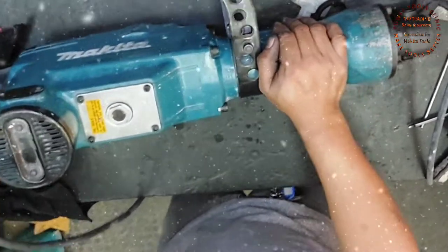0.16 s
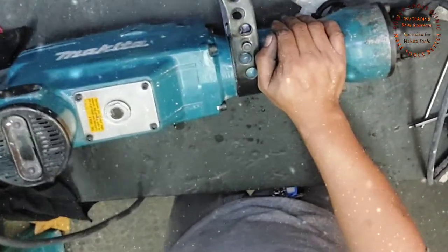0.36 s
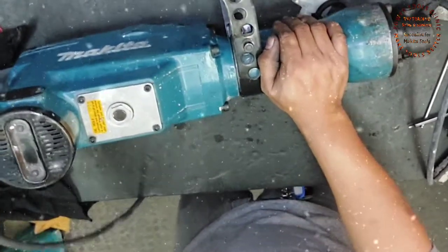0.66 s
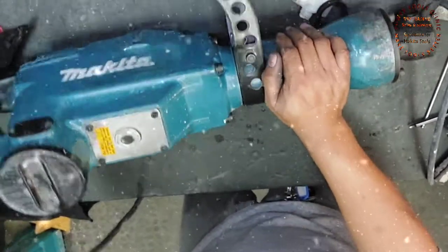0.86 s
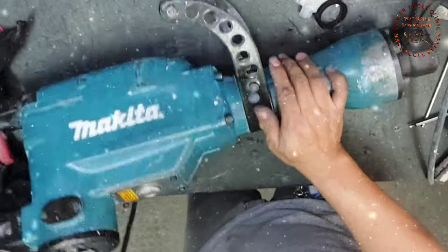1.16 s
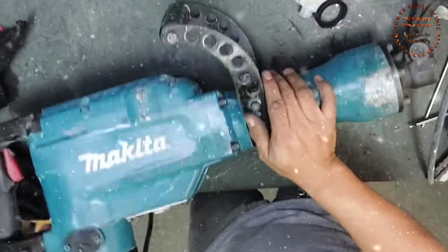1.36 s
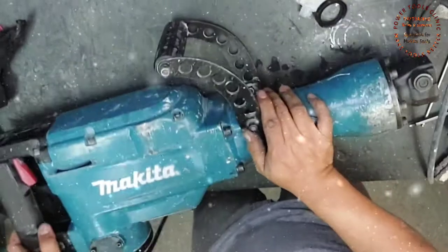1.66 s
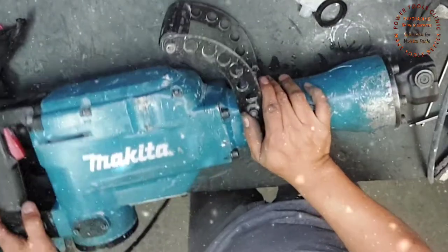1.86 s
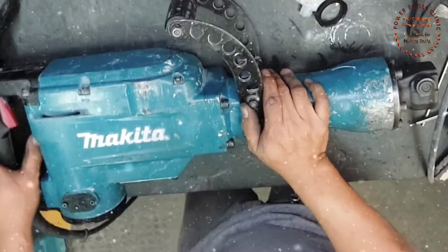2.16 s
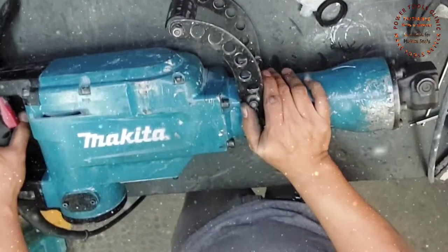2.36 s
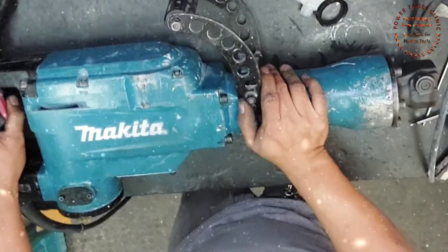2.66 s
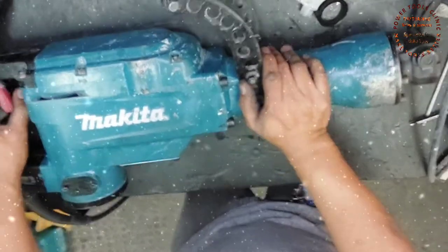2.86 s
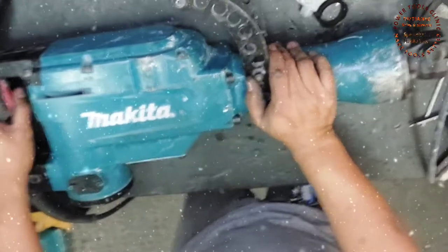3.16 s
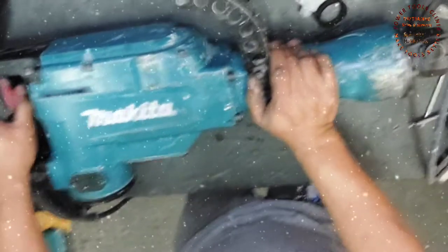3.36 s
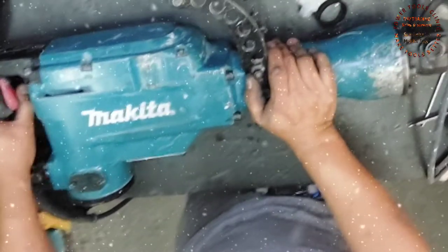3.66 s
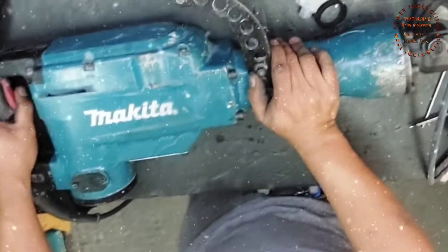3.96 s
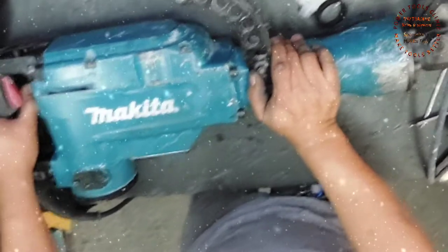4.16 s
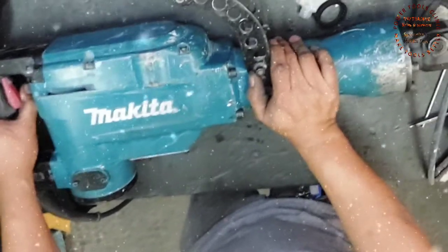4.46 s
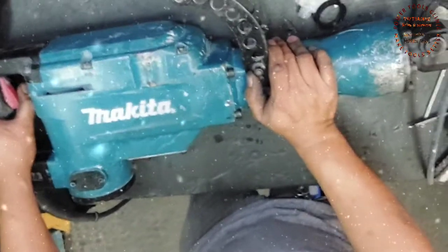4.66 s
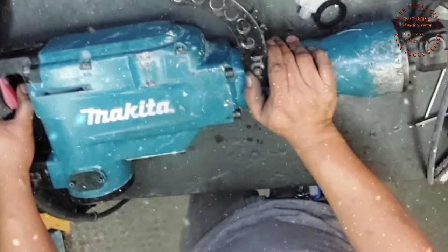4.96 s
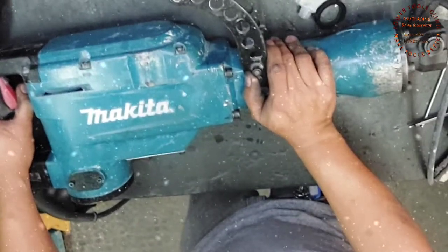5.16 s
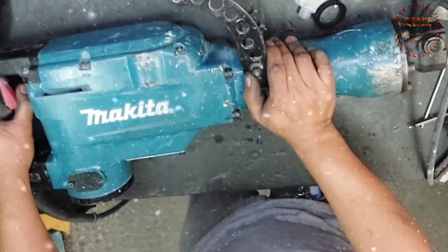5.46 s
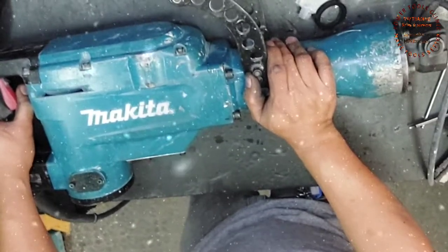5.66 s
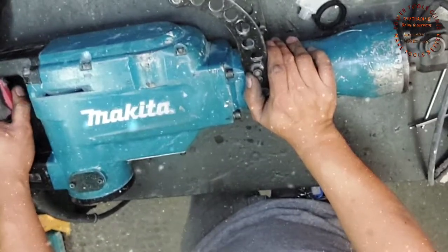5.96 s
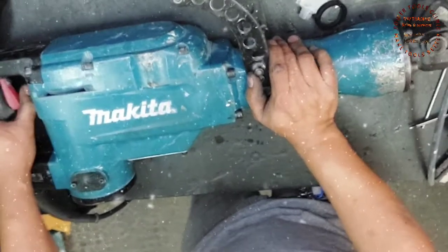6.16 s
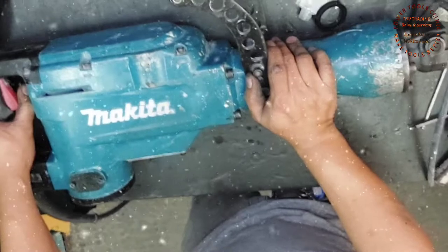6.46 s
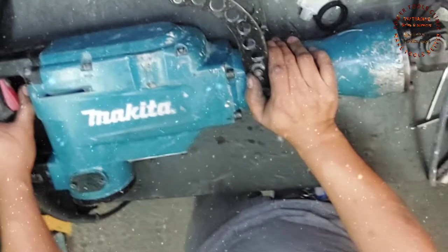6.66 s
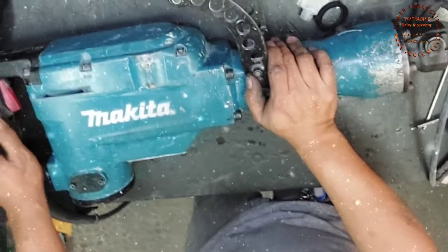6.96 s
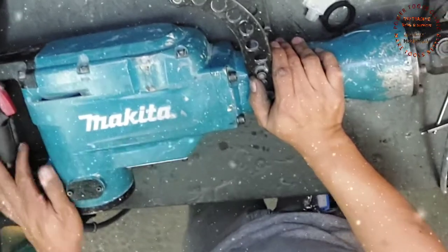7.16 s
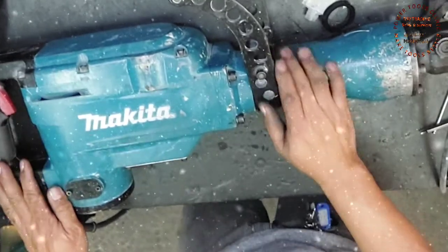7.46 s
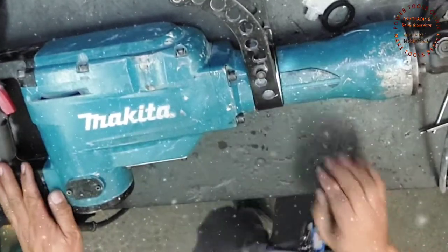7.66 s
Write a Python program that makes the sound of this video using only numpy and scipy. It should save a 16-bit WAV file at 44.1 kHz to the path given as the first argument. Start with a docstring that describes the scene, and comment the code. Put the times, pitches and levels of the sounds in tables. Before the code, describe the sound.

An electric demolition hammer runs unloaded on a steel bench, heard close in a small workshop with a faint low rumble. At the start it is already coasting down, its gears clattering in pulses that slow to a growl and stop by about 1.7 seconds; a faint, thin whistle falls around 0.7. Small bumps and rubbing surround a heavy thud at 2 seconds as the tool is rolled over. At 2.6 it starts with a click and fires three bursts: briefly, then from 3 to 3.5, then from 3.8 to 4.1. The gears rattle fast, the fan hisses and the body drums on the bench. It then winds down, nearly stopping, until a final short burst at 5.8 seconds. The clatter slows again, with two sharp clicks around 6.6 and 6.8, groaning to rest near 7.6 before a light bump.

```python
"""Demolition hammer on a steel bench

An electric hammer runs unloaded: it coasts to rest, is rolled over with a thud, then fires in bursts.
Its gears clatter in one swell per piston stroke and growl as they slow; the fan hisses, and at top
speed the body drums on the bench. A small workshop answers around a close microphone."""
import sys
import numpy as np
from scipy import signal
from scipy.fft import rfft, irfft, next_fast_len
from scipy.io import wavfile
from scipy.ndimage import uniform_filter1d, map_coordinates

SR = 44100
rng = np.random.default_rng(int(sys.argv[2]) if len(sys.argv) > 2 else 0)


def persist_wave(psi):
    """Save psi, clipped to +-1, as 16-bit WAV."""
    counts = np.round(np.clip(psi, -1, 1) * 32767).astype(np.int16)
    wavfile.write(sys.argv[1], SR, np.atleast_2d(counts).T)


N = 344411
TIME = np.arange(N) / SR
TEETH = 65.5  # tooth contacts per stroke; one stroke is one turn of the crank
WORKING_SPEED, GEAR_STALL = 20, 2.67  # strokes/s

# housing resonances: f/Hz, width/Hz, level/dB
HOUSING_MODES = [(601.4, 10.5, 3), (863, 57, -0.5), (1072, 42, -1.5), (1125, 18, -8), (1277, 91, -2),
                 (1388, 95, -2), (1570, 270, -0.5), (1798, 58, -2.5), (1908, 40, 4), (2037, 125, -2),
                 (2160, 73, 0.5), (2382, 43, 2.5), (2621, 17, 7.5), (2693, 89, 1), (3510, 21, -23),
                 (4060, 70, -39), (4585, 36, -32), (4200, 15, -23), (4680, 130, -19), (5416, 82, -0.5),
                 (5417, 73, 4), (5600, 24, -38), (7830, 140, -17.5), (11720, 170, -18.5), (13200, 70, -23)]
# colour of clattering steel: f/Hz, level/dB
CLATTER_SPECTRUM = [(30, -19), (120, -15.5), (300, -9), (700, -2.5), (1100, -7.5), (1600, -3.5),
                    (2600, 1.5), (3200, 2), (4600, -0.5), (5600, -3), (6100, -13), (8200, -13),
                    (10000, -29.5), (16000, -23)]
# colour of the hiss, also the bright edge of clicks and clacks: f/Hz, level/dB
HISS_SPECTRUM = [(100, -18.5), (1000, 1.5), (5000, -0.5), (6300, -3.5), (8000, -1.5), (9200, -7.5),
                 (10600, -6.5), (12200, -4.5), (14000, -11), (16000, -14)]


def amp(db):
    """Decibels to gain."""
    return 10 ** (np.asarray(db) / 20)


def unit(x):
    """Scale to rms 1."""
    return x / np.sqrt(np.mean(x ** 2) + 1e-20)


def along(points, hz):
    """Read (frequency, value) points on a log axis."""
    f, v = np.transpose(points)
    return np.interp(np.log(hz + 1), np.log(f), v)


def curves(rows):
    """One automation curve for each column after the time."""
    times, *columns = np.transpose(rows)
    return [np.interp(TIME, times, column) for column in columns]


def wobble(rate):
    """A smooth random curve, rate knots a second."""
    knots = rng.standard_normal(int(N * rate / SR) + 4)
    return map_coordinates(knots, [TIME * rate])


def noise():
    """Two unrelated white noises."""
    return rng.standard_normal((2, N))


def patchy(depth_db, size=512):
    """Two noises whose colour shifts from moment to moment."""
    spectra = signal.stft(noise(), nperseg=size)[2]
    patches = uniform_filter1d(rng.standard_normal(spectra.shape[1:]), size=2, axis=0)
    patches = unit(uniform_filter1d(patches, size=7, axis=1))
    return unit(signal.istft(spectra * amp(depth_db * patches), nperseg=size)[1][:, :N])


def pulses(cycles, scatter_db):
    """A pulse wherever cycles passes a whole number, up to scatter_db louder or softer."""
    passed = np.floor(np.maximum.accumulate(cycles))
    return np.diff(passed, prepend=passed[0]) * amp(scatter_db * rng.uniform(-1, 1, N))


def filtered(x, response):
    """Filter x by a complex function of frequency."""
    size = next_fast_len(N + SR // 2, True)
    return irfft(rfft(x, size) * response(np.fft.rfftfreq(size, 1 / SR)), size)[..., :N]


def coloured(x, spectrum, size=4096):
    """Minimum-phase EQ with the given spectrum; white noise keeps its level."""
    gain = amp(along(spectrum, np.fft.rfftfreq(size, 1 / SR)))
    cepstrum = irfft(np.log(gain))
    cepstrum[1:size // 2] *= 2
    cepstrum[size // 2 + 1:] = 0
    kernel = irfft(np.exp(rfft(cepstrum)))
    return signal.oaconvolve(x, kernel[None] / np.linalg.norm(kernel), axes=1)[:, :N]


def ringing(x, modes):
    """x rings a set of modes; white noise keeps its level."""
    t = np.arange(SR // 6) / SR
    kernel = sum((-1) ** k * amp(db) * width * np.exp(-np.pi * width * t) * np.cos(2 * np.pi * hz * t)
                 for k, (hz, width, db) in enumerate(modes))
    return signal.oaconvolve(x, kernel[None] / np.linalg.norm(kernel), axes=1)[:, :N]


def spread(pair):
    """Two unrelated signals become left and right, centred in the low mids and wide in the treble."""
    # left-right likeness: f/Hz, correlation/0-1
    likeness = [(30, 0.5), (100, 0.4), (280, 0.98), (600, 1), (1500, 0.17), (4000, 0.39), (9000, 0),
                (15000, 0)]
    angle = lambda hz: np.arccos(np.clip(along(likeness, hz), 0, 1)) / 2
    mid, side = filtered(pair, lambda hz: np.array([np.cos(angle(hz)), np.sin(angle(hz))]))
    return np.array([mid + side, mid - side])


def add(track, start_s, sound):
    """Mix a sound into a track."""
    part = track[..., round(start_s * SR):][..., :sound.shape[-1]]
    part += sound[..., :part.shape[-1]]


def swell(centre_s, width_s):
    """A bell-shaped envelope."""
    return np.exp(-.5 * ((TIME - centre_s) / width_s) ** 2)


def driven_db(effort, growth_db, stall=GEAR_STALL):
    """Level against working speed: up growth_db per doubling of effort, collapsing below the stall."""
    effort = np.maximum(effort, .05)
    return growth_db * np.log2(effort / WORKING_SPEED) - 20 * np.log10(1 + (stall / effort) ** 4)


def crank(start_speed=12.79, free_speed=32.3566, switch_s=.005, step_s=.001):
    """The triggered motor pulls the crank against drag and dry friction; speeds are in strokes/s."""
    # trigger pulls: press/s, release/s, time to take up the slack in the gears/s
    trigger = [(-.1, .0713, 0), (2.6317, 2.8029, 0), (2.9942, 3.4614, 0), (3.8343, 4.0804, 0),
               (5.8263, 6.0219, .011)]
    # the dying crank rocks on the piston's air cushion: t/s, added effort/(strokes/s)
    rocks = [(1.56, 1.02), (1.657, 2.58), (5.715, 0.9), (7.44, 0.2)]
    # the teeth close abruptly and ease off slowly: position/turns, relative load
    load_cycle = [(0, -1.7), (0.033, 0.22), (.22, 0.97), (.42, 0.31), (.57, -0.46), (.85, -0.35), (1, -1.4)]
    pull, friction, drag = 413.68, 7.004, .5471  # strokes/s^2, strokes/s^2, 1/s

    def switched(t, press, release):
        return np.interp(t, [press, press + switch_s, release, release + switch_s], [0, 1, 1, 0])

    moments, speeds = np.arange(0, N / SR, step_s), [start_speed]
    for on in sum(switched(moments, press, release) for press, release, _ in trigger):
        now = speeds[-1]
        acceleration = on * pull * (1 - now / free_speed) ** 2 - drag * now - friction
        speeds.append(max(0, now + step_s * acceleration))
    speed = np.interp(TIME, moments, speeds[1:])
    turns = .0422 + np.interp(TIME, moments, np.cumsum(speeds[1:]) * step_s)
    current = sum(switched(TIME, press + slack_s, release) for press, release, slack_s in trigger)
    torque = current * (1 - speed / free_speed) ** 2
    rocking = np.array([swell(s, width_s=.038) for s, _ in rocks])
    # effort drives loudness: full torque counts as 17 strokes/s more
    effort = speed + 17 * torque ** 1.48 + np.array(rocks)[:, 1] @ rocking
    # strong torque, or the crank rocking back, keeps the teeth closed
    closed = np.clip(.79 * np.tanh((torque / .35) ** 2) + .56 * rocking.sum(axis=0), 0, 1)
    load = np.interp((turns - .831) % 1, *np.transpose(load_cycle))
    load += closed * (1 - load)
    return speed, turns, load, effort, torque, current


def gear_clatter(speed, mesh, load, effort, contact_s=.00051, pinion_teeth=7):
    """Teeth strike and scrape under load, ringing the housing, cover plate, beater case and striker."""
    # cover plate resonances: f/Hz, width/Hz, level/dB
    plate_modes = [(235.3, 14.5, -9.5), (1787, 98, -12), (2635, 102, -1), (2656, 54, 4.5), (5460, 43, -9)]
    # the plate faces up until the body is rolled over: t/s, relative level/dB
    plate_facing = [(0, -4), (.95, -9.5), (1.09, 5), (1.4, -28), (2.7, -10), (7.5, -38)]
    # the beater case rings at speed: f/Hz, width/Hz, level/dB
    beater_modes = [(1375, 86, -5.5), (1620, 110, -17), (3947, 50, 6), (4250, 43, -20), (4337, 88, 6),
                    (4540, 120, -0.5), (4590, 29, 3), (4886, 176, 7), (4970, 32, -1), (5070, 120, -22),
                    (5424, 78, 7.5)]
    # the loose steel striker zings whichever way the body lies: f/Hz, width/Hz, level/dB
    striker_modes = [(5470, 170, 0), (5620, 140, -3)]
    # each contact is a brief scrape; at speed they run together
    touches = pulses(mesh + .12 * wobble(500), scatter_db=12) ** 2
    contact = signal.lfilter([1], [1, -np.exp(-1 / (contact_s * SR))], touches)
    contact /= np.abs(uniform_filter1d(contact, size=4000)) + 1e-3
    scrape = np.sqrt(.5 + .5 * contact) * patchy(depth_db=3)
    # each pinion tooth has its own strength; randomly sized strikes widen the clatter in stereo
    wear = unit(rng.standard_normal(pinion_teeth))[np.floor(mesh).astype(int) % pinion_teeth]
    side_strikes = rng.standard_normal(N)
    teeth = pulses(mesh, scatter_db=2) * np.sqrt(SR / (TEETH * speed + 300))
    strikes = np.array([wear, side_strikes]) * teeth
    stroke_db = (7.5 - .11 * speed) * load
    level_db = -18.5 + driven_db(effort, growth_db=7.5) + stroke_db + .95 * wobble(130)
    force = amp(level_db) * (.39 * strikes + .8 * scrape)
    pace = speed / (speed + 12)
    rattle = amp(-5.5 + 1.77 * pace) * coloured(force, CLATTER_SPECTRUM)
    # the blows reach the other parts a little later, through the metal
    later = lambda ms: np.roll(force, round(ms * SR / 1000), axis=1)
    facing_db, = curves(plate_facing)
    housing = amp(2 - 15.36 * pace) * ringing(later(4.3), HOUSING_MODES)
    plate = ringing(amp(facing_db - .5) * later(1.24), plate_modes)
    beater = amp(-26.5 + 30.4 * pace) * ringing(later(2.9), beater_modes)
    striker = amp(-4 - 23.5 * pace) * ringing(later(.6), striker_modes)
    return spread(rattle + housing + plate + beater + striker)


def gear_growl(speed, mesh, load, effort, torque, knock_speed=5.1, jolt_db=19):
    """Loose teeth knock in the crankcase, most when slow or jolted; a rough whine rides each stroke."""
    # colour of the knocks: f/Hz, level/dB
    growl_spectrum = [(40, -35), (170, -14), (250, -7.5), (330, 7), (440, -1.5), (600, 7), (800, 0.5),
                      (1100, -13), (2000, -1.5), (6000, -62)]
    # crankcase resonances: f/Hz, width/Hz, level/dB
    crankcase_modes = [(270.4, 33, -1.5), (407.6, 30, 0.5), (460, 16.5, -2), (607.6, 30, 1.5),
                       (731, 56, -4), (884, 24, -10.5)]
    # some of the last strokes groan in the crankcase: t/s, boost/dB
    groans = [(1.085, 5), (1.285, 5.5), (5.47, 3), (5.73, 1.5), (7.21, 4), (7.45, 5.5)]
    groan_db = sum(db * swell(s, width_s=.026) for s, db in groans)
    # near knock_speed single teeth are slow enough to ring the case
    slow_db = 5 * np.exp(-2 * np.log(np.maximum(effort, .05) / knock_speed) ** 2)
    knock_db = -45 + driven_db(effort, growth_db=0) + groan_db + slow_db + jolt_db * torque + 5 * load
    teeth = pulses(mesh + .13 * wobble(200), scatter_db=12) * np.sqrt(SR / (TEETH * speed + 20))
    knocks = amp(knock_db) * (teeth + .6 * noise())
    mesh_tone = np.sin(2 * np.pi * (mesh + .097 * wobble(120)))
    whine_db = -37 + driven_db(speed, growth_db=5) + 13.5 * load + 3.7 * wobble(45)
    whine = np.tanh(speed / 4) ** 4 * amp(whine_db) * mesh_tone
    crankcase = amp(-.5) * ringing(knocks, crankcase_modes)
    return amp(-5.5) * coloured(knocks, growl_spectrum) + crankcase + whine


def fan(load, effort, current, brush_db=1.5):
    """Cooling air hisses with each stroke; the brushes add to it while current flows."""
    level_db = -29 + driven_db(effort, growth_db=8, stall=.75) + brush_db * current
    flutter_db = 2 * load + .88 * wobble(90)
    return spread(coloured(amp(level_db + flutter_db) * patchy(depth_db=4), HISS_SPECTRUM))


def clicks(t60_s=.02):
    """Short bright cracks ring the housing; faint even ticks follow while the tool rests."""
    # sharp clicks of the tool: t/s, relative level/dB
    sharp_clicks = [(.578, -21), (1.034, -25), (2.037, -18), (2.63, -9), (5.235, -23), (5.828, -31),
                    (5.839, -18), (6.594, -16), (6.766, -17.5), (7.38, -31), (7.467, -31), (7.602, -43)]
    ticks = [(2.132 + k * .055, -46) for k in range(9)]
    cracks, t = np.zeros((2, N)), np.arange(SR // 10) / SR
    for s, db in list(sharp_clicks) + ticks:
        add(cracks, s, amp(db - 60 * t / t60_s) * rng.standard_normal((2, len(t))))
    snap = amp(-7) * coloured(cracks, HISS_SPECTRUM) + amp(-8.5) * coloured(cracks, CLATTER_SPECTRUM)
    return spread(snap + amp(-.5) * ringing(cracks, HOUSING_MODES))


def bearing_whistle():
    """A bearing sings once, a thin wavering tone that falls."""
    # the whistle's glide: t/s, f/Hz, relative level/dB
    glide = [(.6, 8500, -65), (.66, 7950, -49), (.7, 7520, -48), (.72, 7420, -37), (.75, 7330, -35),
             (.79, 7250, -45), (.83, 7100, -75)]
    hz, level_db = curves(glide)
    envelope = amp(level_db - 4 + 2 * wobble(60.9))
    return envelope * np.sin(2 * np.pi * np.cumsum(hz + 20 * wobble(140)) / SR)


def bumps(reach_octaves=.77, attack_s=.0014, clack_t60_s=.22):
    """The body bumps the bench and rings the modes near each bump's pitch; hard bumps clack as well."""
    # bumps: t/s, thud peak/dB, centre f/Hz, relative clack level/dB
    hits = [(1.446, -24, 300, -70), (1.585, -30.5, 300, -65), (1.684, -22.5, 400, -47),
            (1.785, -39, 120, -70), (1.842, -32, 110, -70), (1.99, -25.5, 110, -43.5),
            (2.028, -5, 164, -26.5), (2.108, -27, 80, -52), (2.137, -40, 140, -54), (2.2, -30, 149, -62),
            (2.33, -26.5, 89.5, -74), (2.377, -21, 327, -72), (2.407, -22.5, 120, -81),
            (2.55, -38, 100, -72), (2.598, -28, 170, -72), (7.761, -33, 450, -46)]
    # steel bench modes: f/Hz, level/dB, t60/s
    bench_modes = [(67.6, -11, 0.37), (119.4, -0.5, 0.28), (180, -8.5, 0.12), (264.4, -3, 0.14),
                   (326, 0.5, 0.088), (375, -1.5, 0.13), (462, -2.5, 0.098)]
    thuds, clacks, t = np.zeros(N), np.zeros((2, N)), np.arange(SR // 2) / SR
    for s, thud_db, centre_hz, clack_db in hits:
        ring = np.zeros(len(t))
        for hz, db, t60 in bench_modes:
            struck_db = db + rng.normal(0, 4.9) - 2 * (np.log2(hz / centre_hz) / reach_octaves) ** 2
            ring += amp(struck_db - 60 * t / t60) * np.sin(2 * np.pi * hz * t)
        ring *= 1 - np.exp(-t / attack_s)
        add(thuds, s, amp(thud_db) * ring / np.abs(ring).max())
        add(clacks, s, amp(clack_db - 60 * t / clack_t60_s) * rng.standard_normal((2, len(t))))
    metal = coloured(clacks, CLATTER_SPECTRUM) + coloured(clacks, HISS_SPECTRUM)
    return thuds + amp(-8.5) * spread(metal)


def sliding(rise_db_per_s=123, fall_db_per_s=51):
    """The body rubs along the bench, shoved by the hands or by its own shaking."""
    # the crest of each shove: t/s, level/dB
    shoves = [(1.66, -35), (2.11, -24), (2.41, -35), (2.61, -31), (4.2, -31), (4.38, -38), (6.95, -43),
              (7.79, -37.5)]
    # colour of the dull rub: f/Hz, level/dB
    rub_spectrum = [(25, -37), (55, 1), (110, 4), (170, -2.5), (260, -11.5), (450, -26), (900, -27.5),
                    (3000, -53), (15000, -54.5)]
    ramps_db = [db + np.minimum(rise_db_per_s * (TIME - s), fall_db_per_s * (s - TIME))
                for s, db in shoves]
    return spread(coloured(amp(np.max(ramps_db, axis=0)) * noise(), rub_spectrum))


def drumming(speed, turns, rebound_turns=.28, hop_edge_s=.054, rolled_over_s=2):
    """The body lands on the bench once a stroke, rebounds and chatters, harder with speed."""
    # near top speed the body hops: start/s, end/s, boost/dB
    hops = [(3.18, 3.524, 8.5), (4.065, 4.206, 10)]
    # colour of the drummed bench: f/Hz, level/dB
    drum_spectrum = [(25, -18), (65, 5), (90, -15), (120, 13), (170, -12), (250, 7.5), (350, -1),
                     (480, -2.5), (650, -31.5), (1500, -45), (6000, -66)]
    edge = lambda s: np.tanh((TIME - s) / hop_edge_s) / 2
    hop_db = sum(db * (edge(start) - edge(end)) for start, end, db in hops)
    damped_db = -15 * (TIME < rolled_over_s)  # the drumming is faint until the body is rolled over
    level_db = -38.5 + .97 * (speed - WORKING_SPEED) + hop_db + damped_db
    phase = turns - .6
    landings = pulses(phase, scatter_db=0)
    rebounds = .81 * pulses(phase - rebound_turns + .02 * wobble(25), scatter_db=1)
    chatter = .5 * pulses(phase + rebound_turns + .04 * wobble(25), scatter_db=16)
    blows = unit(landings + rebounds + chatter) + .34 * noise()
    return coloured(amp(level_db) * blows, drum_spectrum)


def workshop(x, predelay_s=.005):
    """A small room's reverb, each frequency dying at its own rate."""
    # reverb decay: f/Hz, t60/s
    decay = [(100, 0.43), (1000, 0.32), (5000, 0.61), (15000, 0.14)]
    hz, t, spectra = signal.stft(rng.standard_normal((2, SR // 2)), SR, nperseg=256)
    tail = signal.istft(spectra * amp(-60 * t / along(decay, hz)[:, None]), SR, nperseg=256)[1]
    tail = np.pad(tail, ((0, 0), (round(predelay_s * SR), 0)))
    return signal.fftconvolve(x, tail / np.linalg.norm(tail[0]), axes=1)[:, :N]


def scene(lag_s=.00015):
    """The hammer sits slightly left, surrounded by the room's reverb and steady rumble."""
    # slow drift of the gear noise: t/s, level/dB
    gear_drift = [(0, -1.5), (.7, -.5), (1.15, 1), (2.72, 2.9), (3.05, 1), (3.7, -1.16), (4.7, 0.5),
                  (5.95, 3.5), (7.5, 0.8)]
    # room tone: f/Hz, level/dB
    rumble_spectrum = [(25, -18), (65, 1.5), (120, 1.5), (180, -8.5), (300, -6), (700, -15), (2000, -24.5),
                       (5000, -31.5), (9000, -32.5), (16000, -37)]
    speed, turns, load, effort, torque, current = crank()
    # the piston slows and hurries the gears within every turn, the more the slower they run
    ripple = .016 / (1 + (speed / 10.5) ** 2) * np.sin(2 * np.pi * turns)
    mesh = TEETH * (turns + ripple) + .15 * wobble(70)  # running count of tooth contacts
    drift_db, = curves(gear_drift)
    gears = gear_clatter(speed, mesh, load, effort) + gear_growl(speed, mesh, load, effort, torque)
    machine = amp(drift_db) * gears + fan(load, effort, current) + bearing_whistle()
    tool = machine + drumming(speed, turns) + bumps() + sliding() + clicks()
    # the left channel leads by lag_s and is 1 dB louder
    sides = np.array([[.5], [-.5]])
    direct = amp(sides) * filtered(tool, lambda hz: np.exp(2j * np.pi * hz * lag_s * sides))
    reverb = amp(-11.5) * workshop(tool)
    rumble = amp(-44.5) * spread(coloured(noise(), rumble_spectrum))
    return direct + reverb + rumble


def record(dry, low_hz=38, top_hz=15800, ceiling=.92):
    """The microphone thins the deepest bass, rounds the highest peaks and cuts the extreme treble."""
    thinned = signal.sosfilt(signal.butter(2, low_hz, "high", fs=SR, output="sos"), dry)
    rounded = thinned / (1 + np.abs(thinned / ceiling) ** 6) ** (1 / 6)
    return filtered(rounded, lambda hz: hz < top_hz)


dry = scene()
out = record(dry)
persist_wave(out)
```